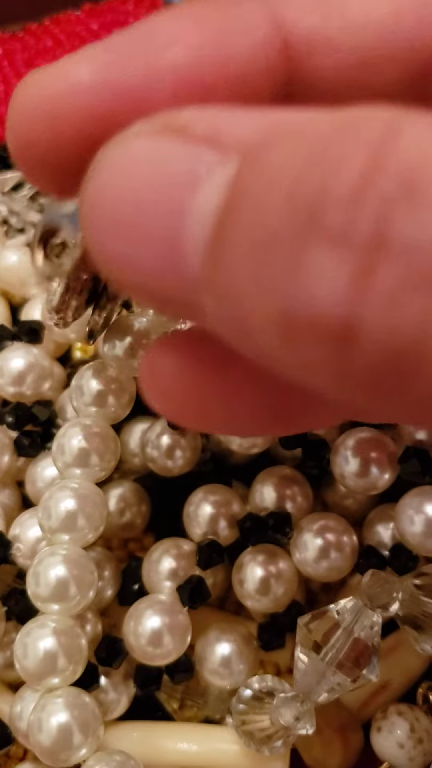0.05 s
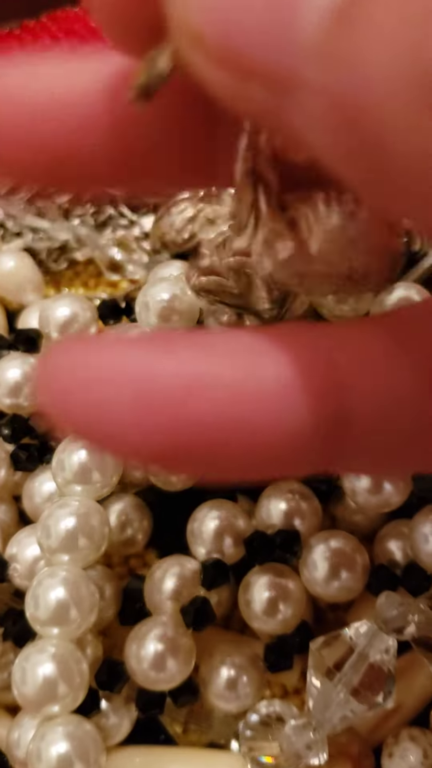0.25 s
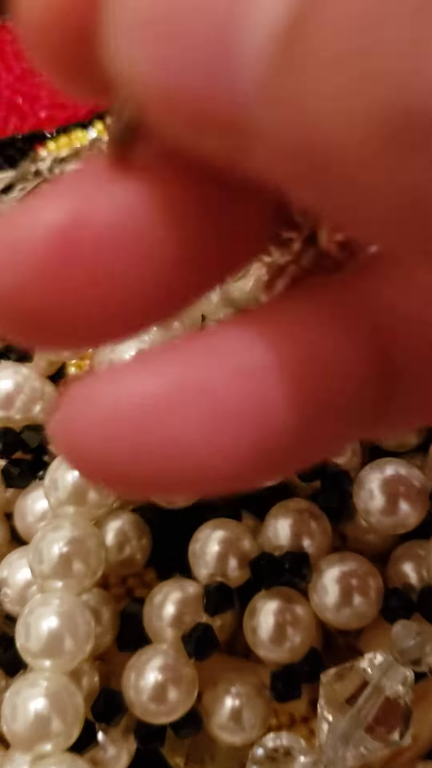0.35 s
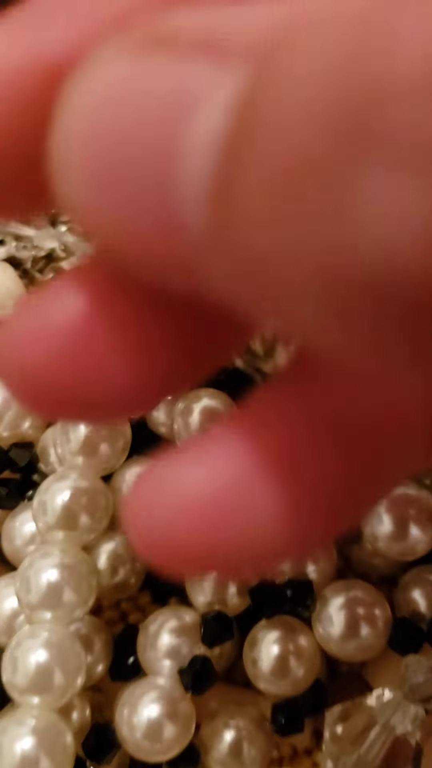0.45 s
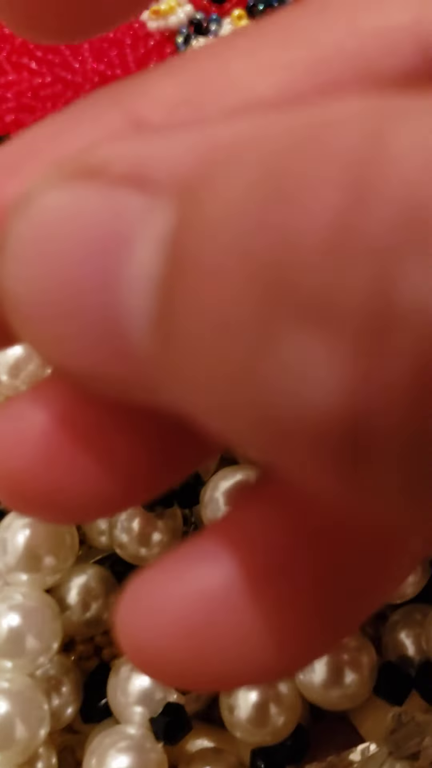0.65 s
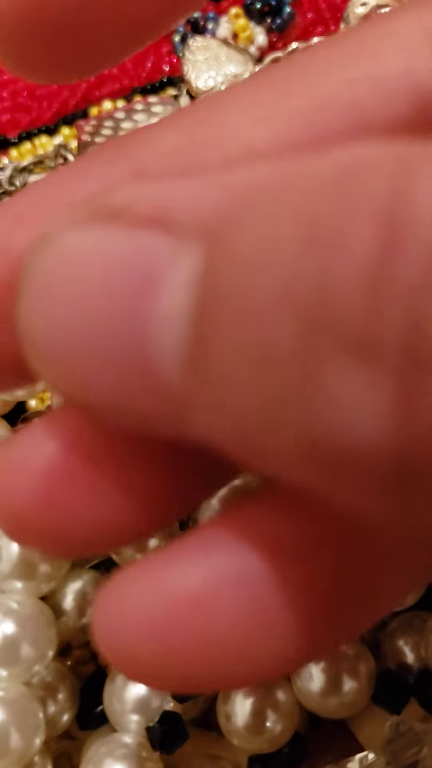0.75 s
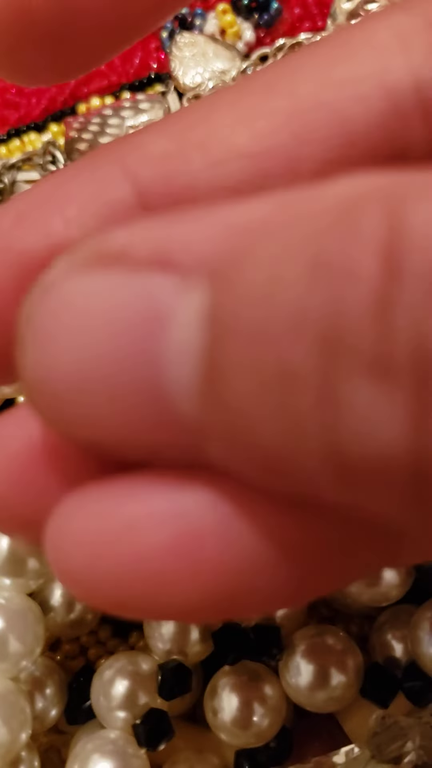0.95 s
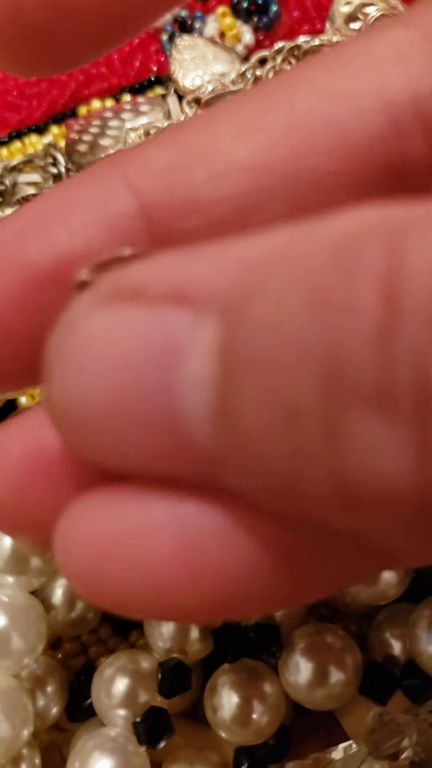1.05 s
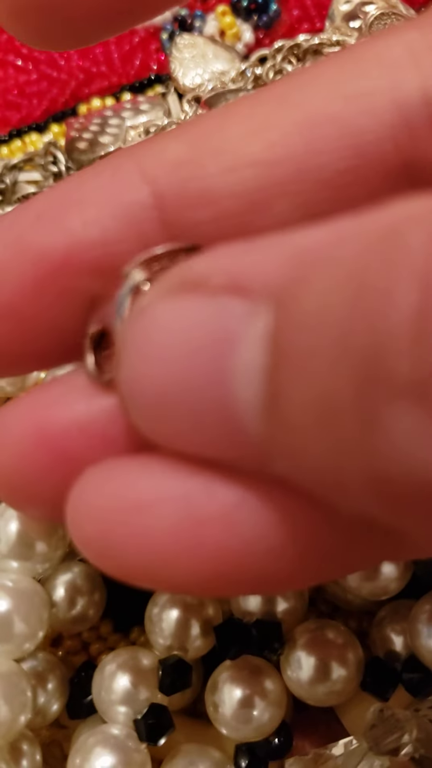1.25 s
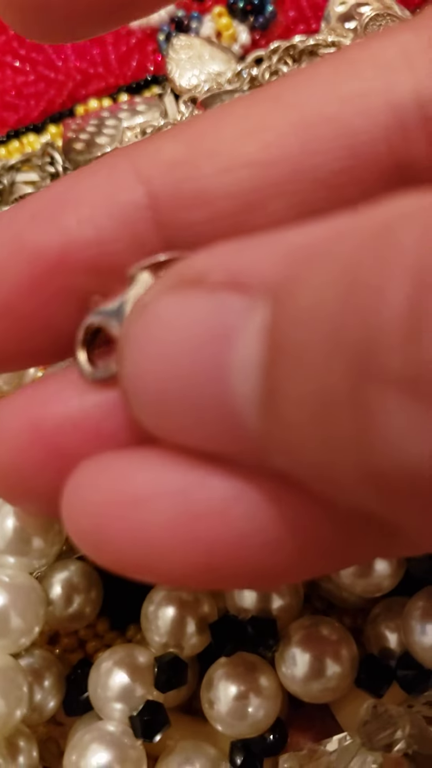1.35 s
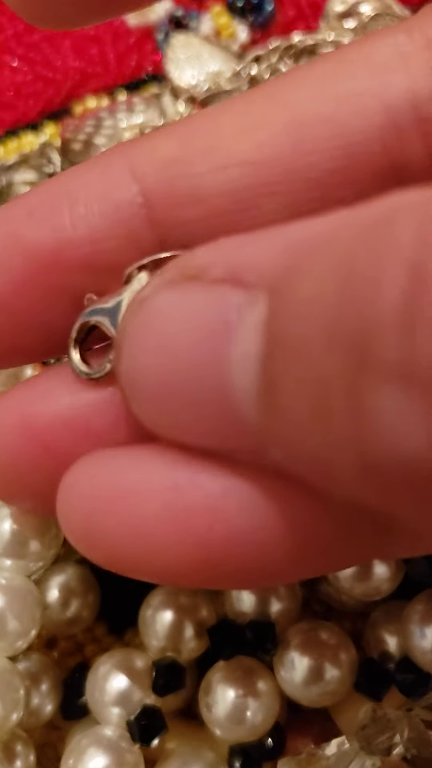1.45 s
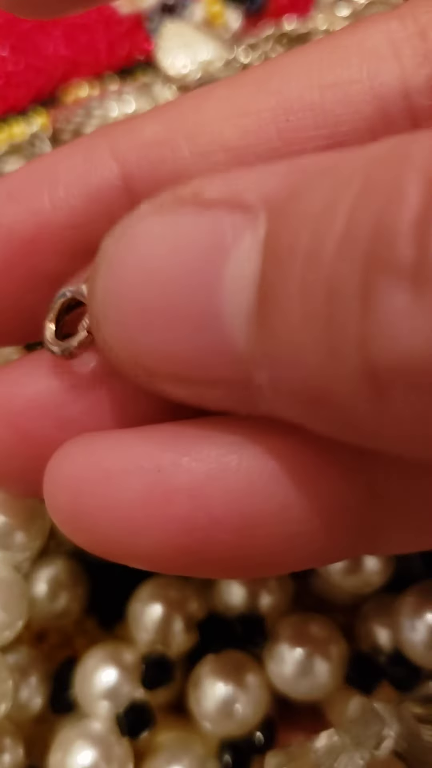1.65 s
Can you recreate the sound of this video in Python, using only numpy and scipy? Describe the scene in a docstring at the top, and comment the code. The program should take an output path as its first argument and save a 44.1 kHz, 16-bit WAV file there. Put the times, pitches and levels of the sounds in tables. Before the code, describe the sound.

Close to the microphone, a jewelry chain rustles and its clasp clinks in a quick, high-pitched flurry. A soft hand swish and faint ticks follow, then two muffled clasp clicks between fingers, over a quiet room's low hum.

```python
"""A chain lifted from a heap of necklaces

Close by, fingers lift a metal chain by its clasp out of a heap of bead necklaces. Tiny collisions excite the
modes of the links, which rustle; the clasp clinks and bounces, each impact a tick and a decaying ring. The hand
brushes past, then the clasp clicks three times, damped by the fingers, and skin slides over it. Behind it lies
a quiet room with mains hum."""
import sys
import numpy as np
from scipy import signal
from scipy.fft import rfft, irfft
from scipy.io import wavfile
from scipy.ndimage import uniform_filter1d

SR = 44100
rng = np.random.default_rng(int(sys.argv[2]) if len(sys.argv) > 2 else 0)


def waveform_to_disk(signal):
    """Save audio, clipped to [-1, 1], as 16-bit WAV at the path in sys.argv[1]."""
    frames = np.transpose(np.atleast_2d(signal))
    scaled = np.clip(frames, -1, 1) * 32767
    samples = np.round(scaled).astype(np.int16)
    wavfile.write(sys.argv[1], SR, samples)


N = 74970
TIME = np.arange(N) / SR

# Noise spectra of room air, rumble, hand and sliding skin (frequency [Hz], relative level [dB])
AIR_SPECTRUM = [(300, -12), (560, -5), (780, -9), (1000, -3), (1170, -7), (1400, -1), (1700, 1), (1900, -3),
                (2150, -4), (2550, -16), (3800, -13), (4700, -19), (6700, -18), (7600, -29), (9400, -33),
                (12000, -28), (15600, -28), (16100, -55)]
RUMBLE_SPECTRUM = [(15, -21), (26, -15.5), (38, -8), (55, -1), (72, -2), (88, -6.5), (105, 0.5),
                   (150, -1.5), (200, -3), (260, 0), (310, -8), (370, -8.5), (450, -13), (700, -29),
                   (2000, -75.5)]
BRUSH_SPECTRUM = [(120, -10), (300, -3.5), (470, -2.5), (590, 1), (780, -15), (1000, -12.5), (1450, -11),
                  (2300, -18), (3400, -16), (5200, -23), (8000, -28.5), (15000, -44)]
RUB_SPECTRUM = [(150, -18), (450, -8), (720, 8), (900, -0.5), (1300, -4), (3000, -31), (6500, -37.5),
                (9000, -46.5)]
# Stereo balance of the noises (frequency [Hz], left over right [dB])
AIR_PAN = [(380, -2), (700, 2), (1000, 12), (1400, 17), (2400, 15), (4400, 11), (8100, 8), (15000, 1)]
RUMBLE_PAN = [(60, 0), (110, 8.5), (200, -11), (380, 2)]
BRUSH_PAN = [(300, 0), (650, -5.5), (1300, 6), (4400, 0.5), (8000, -10), (15000, -11)]
# Likeness of the two channels (frequency [Hz], correlation [0-1])
AIR_CORRELATION = [(300, 1), (640, 0.36), (1400, 0)]
RUMBLE_CORRELATION = [(60, 0.99), (130, 0.99), (290, 0.94), (500, 0.52)]
BRUSH_CORRELATION = [(200, 1), (700, 0), (2000, 0)]
# Partials of the mains hum (frequency [Hz], level [dB], left over right [dB])
HUM_PARTIALS = [(58.5, -66.5, -3), (117.8, -64, 9.5), (239.4, -56.5, 1), (407, -69.5, -14.5),
                (1002.5, -77, 22.5)]
# Reverberation time of the room (frequency [Hz], T60 [s])
ROOM_DECAY = [(500, 0.69), (4000, .3), (15000, .22)]
# Envelopes of the hand, sliding skin, small links and larger rings (time [s], level [dB])
BRUSH_ENVELOPE = [(.425, -62), (.445, -50.5), (.5, -50.5), (.57, -48), (.61, -54.5), (.66, -60.5),
                  (.78, -72), (.95, -81)]
RUB_ENVELOPE = [(1.46, -88.5), (1.53, -67), (1.6, -68.5), (1.7, -65.5)]
LINK_ENVELOPE = [(.085, -84), (.11, -76), (.135, -50.5), (.17, -49.5), (0.194, -66), (.22, -55.5),
                 (.24, -40.5), (.285, -64.5), (.345, -60.5), (.372, -41), (.395, -66.5), (.435, -46.5),
                 (.47, -62), (.58, -71.5), (.68, -76), (.81, -76), (.88, -91.5)]
RING_ENVELOPE = [(.29, -66.5), (.312, -56), (.328, -43.5), (.345, -55.5), (.355, -38), (.37, -52.5),
                 (.39, -45), (.415, -45.5), (.435, -52), (.48, -85), (.52, -98)]
# Modes of the links and rings (frequency [Hz], relative level [dB], T60 [s], left over right [dB])
LINK_MODES = [(4600, -16, .003, -0.5), (7400, -16, .003, -29.5), (10500, -17.5, .002, -6.5),
              (11900, -11.5, .004, -20), (12630, -1.5, .008, -9), (14200, -13.5, .007, -2),
              (14070, -7, .006, -3)]
RING_MODES = [(3200, -7.5, .01, -1), (3520, -0.5, 0.032, 7), (3970, -8.5, .007, 1),
              (4900, -2, 0.0036, -1.5), (7720, -8, 0.0043, -24.5), (7980, 2.5, 0.022, -3.5),
              (14340, 3, .03, -17.5)]
# Touches on a small loose ring (time [s], level [dB])
PING_TOUCHES = [(.39, -42), (0.4023, -39), (.411, -34.5), (0.8053, -58.5)]
# Clicks of the clasp in the fingers (time [s], level [dB])
HELD_CLICKS = [(1.4915, -35), (1.5242, -33.5), (1.5333, -45)]
# Modes of the held clasp (frequency [Hz], relative level [dB], T60 [s])
HELD_MODES = [(1105, -7.5, 0.0042), (1640, 1.5, 0.0065), (3100, -0.5, 0.0015), (4700, -8, 0.00066),
              (5470, -22.5, .02)]
# Spectrum of a contact tick (frequency [Hz], relative level [dB])
TICK_SPECTRUM = [(300, -39), (1500, -11), (2600, -4.5), (3700, 3.5), (4500, 5.5), (5200, 4), (6300, -10),
                 (7700, -2), (9200, -17), (11500, 4), (15000, -6.5), (16500, -11.5)]
# Stereo balance of that tick (frequency [Hz], left over right [dB])
TICK_PAN = [(1500, 12), (4500, 3), (7500, -4), (14000, -5)]
# Modes of the free clasp (frequency [Hz], relative level [dB], share of the impact's T60 [ratio])
CLASP_MODES = [(12585, -2, 0.75), (12500, -22, .9), (12700, -19.5, 0.78), (12080, -27, 0.54),
               (14120, -11.5, 0.53), (14600, -13.5, .5), (14990, -10, 1), (15420, -28.5, .5)]
# Impacts of the clasp (time [s], ring level [dB], T60 [s], upper-mode gain [dB], tick level [dB],
# ring's left over right [dB])
CLASP_IMPACTS = [(0.1055, -45, .013, 2, -41.5, -15), (0.128, -60.5, .03, -2, -66, -18),
                 (0.1335, -55, .03, 25.5, -62.5, -9), (0.1354, -71.5, .012, -31, -44, -6),
                 (0.151, -38, .025, -5.5, -64, -2.5), (.1664, -38, .016, -0.5, -42.5, -6.5),
                 (0.2215, -20.5, .065, -11, -22.5, -9.5), (0.228, -40.5, .05, -14, -32.5, -13.5),
                 (.2328, -33.5, .03, -2, -43, -14), (0.2374, -27, .05, -22, -30.5, -15.5),
                 (.2521, -23.5, .055, -27, -37.5, -11), (.2595, -38.5, .09, -11, -51, -10),
                 (0.3016, -33.5, .045, -11.5, -37.5, -7.5), (.3205, -39.5, .04, -15.5, -58, -13),
                 (0.325, -40.5, .03, -14.5, -63, -7), (.3525, -30.5, .02, 3.5, -41.5, -3),
                 (0.3546, -13, .017, -3, -21.5, -8.5), (0.3617, -21.5, .018, 0, -25, 17.5),
                 (0.365, -24.5, .035, 2.5, -29, -2), (0.37, -29.5, .035, -3.5, -28, -14),
                 (0.3818, -39, .02, -4.5, -23, -1.5), (0.3886, -35, .03, -4, -28.5, -5),
                 (0.4007, -39.5, .03, -9.5, -35.5, -13), (.4293, -29, .008, 3, -50, -12),
                 (.5642, -44, .011, 6.5, -41, -17), (0.5855, -57, .01, -2, -43, -4),
                 (0.6313, -48.5, .011, -2, -51, -12), (0.7438, -66, .008, 18, -43, -12),
                 (0.798, -60, .01, 11, -49, -15), (.806, -57.5, .02, -29, -58, -14)]


def amp(db):
    """Amplitude grows tenfold for every 20 dB."""
    return 10 ** (np.asarray(db) / 20)


def unit_rms(x):
    """Normalisation to unit mean power."""
    return x / np.sqrt(np.mean(x ** 2) + 1e-20)


def at_frequency(points, hz):
    """Interpolation of a table on a logarithmic frequency axis."""
    knots_hz, values = np.transpose(points)
    return np.interp(np.log(hz + 1), np.log(knots_hz + 1), values)


def envelope(points):
    """Gain over time, piecewise linear in decibels and silent outside the table."""
    return amp(np.interp(TIME, *np.transpose(points), left=-140, right=-140))


def pan(db):
    """Constant-power panning: left and right gains for a given level difference."""
    ratio = amp(np.atleast_1d(db))
    return np.array([ratio, np.ones_like(ratio)]) * np.sqrt(2 / (1 + ratio ** 2))


def add(mix, start_s, sound):
    """Superposition: a stereo sound sums into the mix from its start time."""
    part = mix[:, round(start_s * SR):][:, :sound.shape[1]]
    part += sound[:, :part.shape[1]]


def mode(hz, t60, shape=1, size=6000, rise_s=0.00018):
    """Damped oscillation: a sinusoid rises smoothly and is 60 dB down at t60 seconds."""
    t = TIME[:size]
    decay = np.exp(-np.log(1000) * (t / t60) ** shape)
    onset = 1 - np.exp(-(t / rise_s) ** 2)
    return np.sin(2 * np.pi * hz * t) * decay * onset


def choke(after_s, decay_s, size=6000):
    """Contact damping: a gain that falls exponentially once the next touch arrives."""
    return np.exp(-np.maximum(TIME[:size] - after_s, 0) / decay_s)


def noise(spectrum, balance, correlation):
    """Partial coherence: shaped stereo noise sounds wider the less its channels share."""
    hz = np.fft.rfftfreq(N, 1 / SR)
    common, independent = rfft(rng.standard_normal((2, N)))
    share = np.clip(at_frequency(correlation, hz), -1, 1)
    pair = np.array([common, share * common + np.sqrt(1 - share ** 2) * independent])
    return unit_rms(irfft(pair * amp(at_frequency(spectrum, hz)) * pan(at_frequency(balance, hz)), N))


def room_noise(air_db=-64, rumble_db=-55.5, swell_db=1.5):
    """Broadband noise: steady air over a slowly modulated rumble of room and handling."""
    rates_hz = rng.uniform(2, 14, size=16)
    swell = unit_rms(sum(np.sin(2 * np.pi * (hz * TIME + rng.random())) for hz in rates_hz))
    air = amp(air_db) * noise(AIR_SPECTRUM, AIR_PAN, AIR_CORRELATION)
    rumble = noise(RUMBLE_SPECTRUM, RUMBLE_PAN, RUMBLE_CORRELATION)
    return air + amp(rumble_db + swell_db * swell) * rumble


def mains_hum(waver=0.3):
    """Beating: weak sidebands close to each partial make the hum waver gently."""
    out = np.zeros((2, N))
    for hz, db, pan_db in HUM_PARTIALS:
        offsets_hz = rng.uniform(-8, 6, size=12)
        drift = sum(np.exp(2j * np.pi * (offset * TIME + rng.random())) for offset in offsets_hz)
        carrier = np.exp(2j * np.pi * (hz * TIME + rng.random()))
        tone = (1 + waver * drift / np.std(drift)) * carrier
        out += amp(db) * pan(pan_db) * unit_rms(tone.real)
    return out


def reverberation(x, level_db=-18.5):
    """Diffuse reflections: convolution with a noise tail that decays faster in the treble."""
    hz, t, spectra = signal.stft(rng.standard_normal((2, SR // 2)), SR, nperseg=256)
    decay = np.exp(-np.log(1000) * t / at_frequency(ROOM_DECAY, hz)[:, None])
    tail = signal.istft(spectra * decay, SR, nperseg=256)[1]
    return amp(level_db) * signal.fftconvolve(x, tail / np.linalg.norm(tail[0]), axes=1)[:, :N]


def hand_brush(grain_db=2):
    """Friction noise: the passing hand swishes, with a grain of fast level fluctuations."""
    grain = unit_rms(uniform_filter1d(rng.standard_normal(N), size=200))
    swish = noise(BRUSH_SPECTRUM, BRUSH_PAN, BRUSH_CORRELATION)
    return swish * envelope(BRUSH_ENVELOPE) * amp(grain_db * grain)


def finger_rub(pan_db=19):
    """Sliding friction: skin on the clasp gives a quiet band of noise."""
    return noise(RUB_SPECTRUM, [(1000, pan_db)], AIR_CORRELATION) * envelope(RUB_ENVELOPE)


def chain_rattle(modes, levels, hits_per_s, detune, links=10, spread_db=4.5, phase_spread_rad=0.78):
    """A Poisson process: random collisions ring links, each with its own pitches and stereo phases."""
    hits = rng.random(N) < hits_per_s / SR
    strength = amp(spread_db * np.minimum(rng.exponential(1, N), 4))
    struck_link = rng.integers(0, links, N)
    responses, out = np.zeros((links, 2, 2048)), np.zeros((2, N))
    for hz, db, t60, pan_db in modes:
        for link, offset in enumerate(rng.permutation(np.linspace(-1, 1, links))):
            analytic = signal.hilbert(unit_rms(mode(hz * (1 + detune * offset), t60, size=2048)))
            phase_shift = np.exp(1j * phase_spread_rad * rng.standard_normal((2, 1)))
            responses[link] += amp(db) * pan(pan_db) * (analytic * phase_shift).real
    for sample in np.flatnonzero(hits):
        add(out, sample / SR, strength[sample] * responses[struck_link[sample]])
    return unit_rms(out) * envelope(levels)


def loose_ring(hz=11300, t60=0.032, pan_db=-18.5):
    """Free vibration: a small ring pings in one high mode, restarted by each touch."""
    out, tone = np.zeros((2, N)), mode(hz, t60)
    ends = [touch[0] for touch in PING_TOUCHES[1:]] + [N / SR]
    for (start, db), end in zip(PING_TOUCHES, ends):
        add(out, start, amp(db) * pan(pan_db) * tone * choke(end - start, decay_s=0.0011))
    return out


def held_clasp(pan_db=14):
    """Heavy damping: the fingers shorten the clasp's vibration to a dull click."""
    out = np.zeros((2, N))
    click = sum(amp(db) * mode(hz, t60) for hz, db, t60 in HELD_MODES)
    for start, db in HELD_CLICKS:
        add(out, start, amp(db) * pan(pan_db) * click)
    return out


def contact_tick(size=1024):
    """Impulse response of metal touching metal: minimum phase packs its energy at the onset."""
    hz = abs(np.fft.fftfreq(size, 1 / SR))
    gain = amp(at_frequency(TICK_SPECTRUM, hz)) * pan(at_frequency(TICK_PAN, hz))
    minimum_phase = np.exp(np.conj(signal.hilbert(np.log(gain))))
    tick = np.fft.ifft(minimum_phase).real
    return tick / abs(tick).max()


def clasp_clinks(upper_hz=13500, faint_db=-40, detune=0.04, scrape=0.12, scrape_s=0.00035):
    """Impact excitation: each knock ticks and rings the clasp's modes until the next chokes them."""
    out, tick, t = np.zeros((2, N)), contact_tick(), TIME[:6000]
    ends = [impact[0] for impact in CLASP_IMPACTS[1:]] + [N / SR]
    for (start, ring_db, t60, upper_db, tick_db, pan_db), end in zip(CLASP_IMPACTS, ends):
        pitch = 1 + detune * rng.uniform(-1, 1) * (ring_db < faint_db)  # faint knocks ring nearby links
        ring = sum(amp(db + upper_db * (hz > upper_hz)) * mode(hz * pitch, t60 * share, shape=1.4)
                   for hz, db, share in CLASP_MODES)
        add(out, start, amp(ring_db) * pan(pan_db) * ring * choke(end - start, decay_s=0.001))
        # The contact force is an impulse followed by a brief scrape.
        force = (t == 0) + scrape * rng.standard_normal(len(t)) * np.exp(-t / scrape_s)
        add(out, start, amp(tick_db) * signal.fftconvolve(tick, force[None], axes=1))
    return out


def scene(right_lag_s=0.0002634):
    """Superposition of metal, reverberation, hand and room; the metal reaches the right side later."""
    metal = clasp_clinks()
    metal += chain_rattle(LINK_MODES, LINK_ENVELOPE, hits_per_s=3000, detune=0.035)
    metal += chain_rattle(RING_MODES, RING_ENVELOPE, hits_per_s=2400, detune=0.028)
    metal += loose_ring() + held_clasp()
    delay = np.exp(-2j * np.pi * np.fft.rfftfreq(N, 1 / SR) * right_lag_s)
    metal[1] = irfft(rfft(metal[1]) * delay, N)
    return metal + reverberation(metal) + hand_brush() + finger_rub() + room_noise() + mains_hum()


def record(dry, cutoff_hz=16450):
    """Band limiting: the recorder's steep low-pass filter removes the highest treble."""
    lowpass = signal.firwin(401, cutoff_hz, window=("kaiser", 9), fs=SR)
    return signal.oaconvolve(dry, lowpass[None], "same")


dry = scene()
out = record(dry)
waveform_to_disk(out)
```